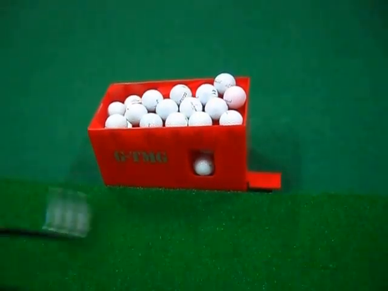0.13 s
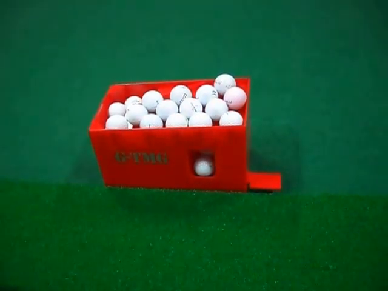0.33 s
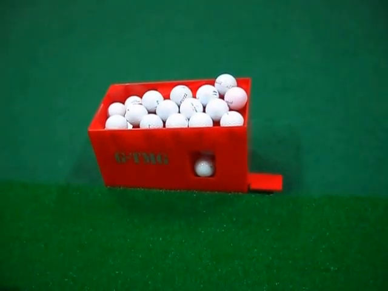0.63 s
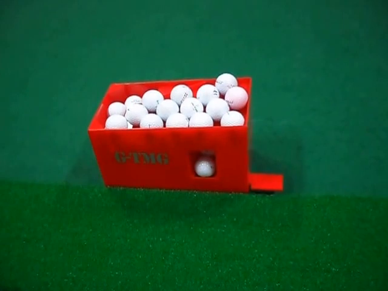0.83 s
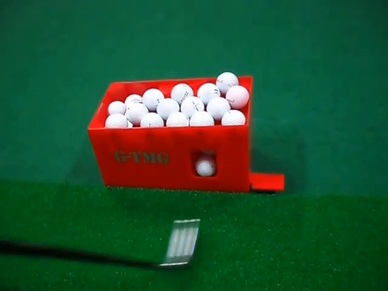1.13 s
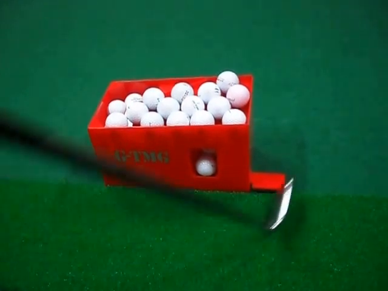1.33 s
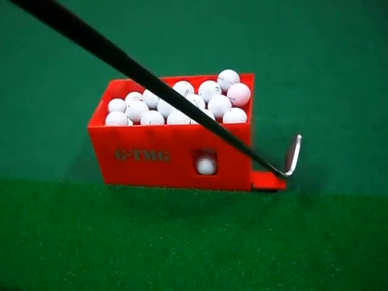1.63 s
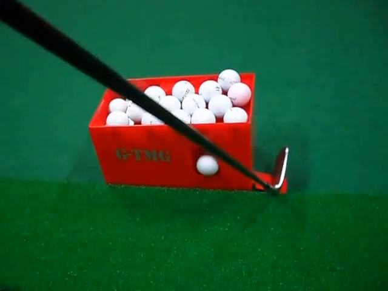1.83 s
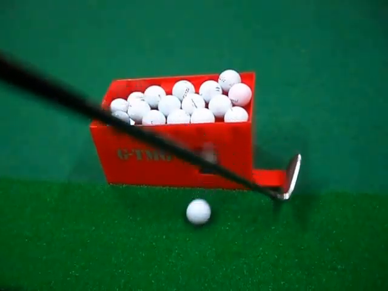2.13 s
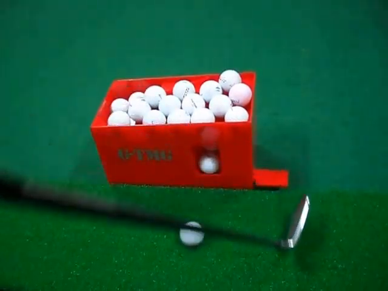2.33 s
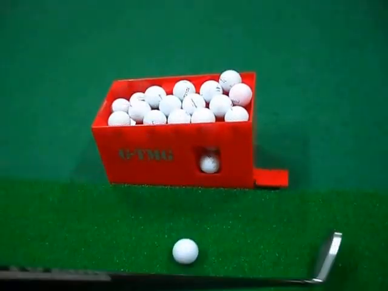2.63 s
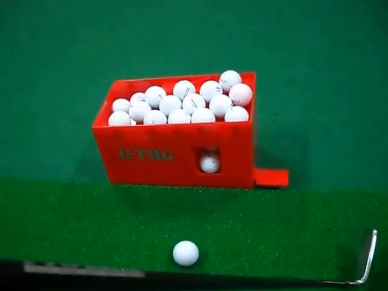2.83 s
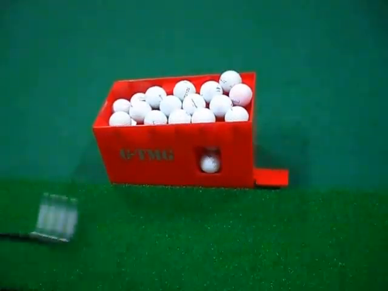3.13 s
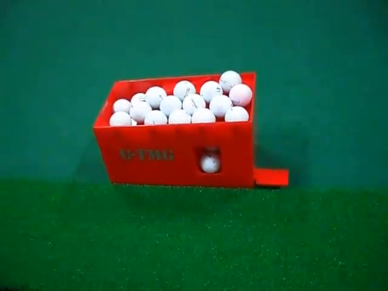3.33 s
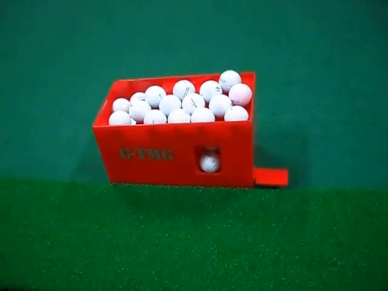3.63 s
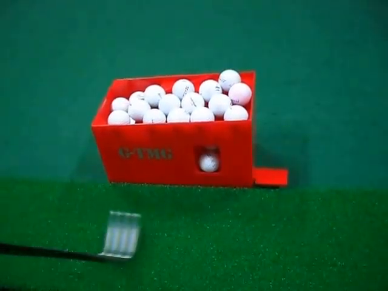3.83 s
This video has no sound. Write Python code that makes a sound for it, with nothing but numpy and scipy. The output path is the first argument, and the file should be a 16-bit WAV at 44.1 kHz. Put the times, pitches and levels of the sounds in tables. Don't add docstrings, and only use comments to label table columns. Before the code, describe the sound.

Golf chip shots in a small room, with padded thuds and a hollow plastic dispenser clacking between

```python
import sys
import numpy as np
from scipy import signal
from scipy.fft import rfft, irfft
from scipy.io import wavfile
from scipy.ndimage import map_coordinates

SR = 44100
rng = np.random.default_rng(int(sys.argv[2]) if len(sys.argv) > 2 else 0)


def makeup_ratio(level_db):
    decades = np.asarray(level_db, float) / 20
    return 10 ** decades


def digitize_waveform(pressure):
    field = np.atleast_2d(pressure).T
    bounded = np.clip(field, -1, 1)
    quanta = np.round(bounded * 32767).astype(np.int16)
    wavfile.write(sys.argv[1], SR, quanta)


N = 176400
SPAN = 2 ** 15
HZ = np.fft.rfftfreq(SPAN, 1 / SR)


def along(points, hz):
    f, v = np.transpose(points)
    return np.interp(np.log(hz + 1), np.log(f + 1), v)


def wobble(rate):
    knots = rng.standard_normal(int(N * rate / SR) + 4)
    return map_coordinates(knots, [np.arange(N) * rate / SR])


def hiss():
    # (frequency [Hz], density [dB per Hz])
    hiss_colour = [(18, 12), (30, 20), (60, 7), (90, 12.5), (300, 4), (1100, -1), (4000, -7),
                   (10400, -10.5)]
    hiss_db = -61.5
    gain = makeup_ratio(along(hiss_colour, np.fft.rfftfreq(N, 1 / SR)))
    noise = irfft(rfft(rng.standard_normal(N)) * gain, N)
    return makeup_ratio(hiss_db) * noise / noise.std()


def hum():
    # (time [s], level [dB])
    hum_swell = [(0.0, -60), (0.38, -66.5), (0.72, -52), (1.15, -59), (2.18, -59.5), (2.31, -62.5),
                 (2.53, -66), (2.67, -58), (2.84, -59), (3.3, -62.5), (3.52, -55.5), (4.0, -56.5)]
    hum_hz, wander_hz = 53.77, 5.02
    s, swell_db = np.transpose(hum_swell)
    level_db = np.interp(np.arange(N) / SR, s, swell_db) + 3 * wobble(9)
    phase = 2 * np.pi * np.cumsum(hum_hz + wander_hz * wobble(20)) / SR
    return np.sqrt(2) * makeup_ratio(level_db) * np.sin(phase)


def room(room_db):
    # (frequency [Hz], t60 [s])
    room_decay = [(60, 0.89), (250, 0.56), (1300, 0.67), (3500, 0.67), (9000, 0.4)]
    # (delay [s], level [dB])
    near_walls = [(.0052, -14.5), (0.0129, -12.5), (0.0162, -15), (0.025, -17.5)]
    build_s, scatter_s = 0.015, 0.0007
    hz, t, z = signal.stft(rng.standard_normal(SPAN), SR, nperseg=256)
    fade = makeup_ratio(-60 * t / along(room_decay, hz)[:, None])
    tail = signal.istft(z * fade, SR, nperseg=256)[1][:SPAN]
    s = np.arange(SPAN) / SR
    tail = tail * np.clip(s / build_s, 0, 1) ** 2 * (s < s[-1] - .08)
    bursts = sum(makeup_ratio(db) * (s > d) * np.exp(-np.abs(s - d) / scatter_s) for d, db in near_walls)
    walls = bursts * rng.standard_normal(SPAN) / np.sqrt(scatter_s * SR / 2)
    return rfft(walls + makeup_ratio(room_db) * tail / np.linalg.norm(tail))


def body(modes, order=1):
    total = 0
    for k, (centre, width, db) in enumerate(modes):
        resonance = 1j * HZ * width / (centre ** 2 - HZ ** 2 + 1j * HZ * width)
        total = total + (-1) ** k * makeup_ratio(db) * resonance ** order
    return total


def rattle(spread_s, first_db, count):
    u, size = rng.random(count), rng.standard_normal(count)
    u[0], size[0] = 0, -makeup_ratio(first_db)
    return np.transpose([2 * abs(spread_s) * u, size * makeup_ratio(-14 * u)])


def add(out, s, db, colour, contacts, room_db):
    lag, size = np.transpose(contacts)
    blow = (size * np.exp(-2j * np.pi * np.outer(HZ, lag))).sum(1) / np.linalg.norm(size)
    sound = out[int(round(s * SR)):][:SPAN]
    sound += makeup_ratio(db) * irfft(colour * (blow + room(room_db)), SPAN)[:len(sound)]


def thuds():
    # (time [s], level [dB], knock over boom [dB], shaking [s], first contact over the rest [dB])
    thud_events = [(.273, -32, 3, 0.0039, 14), (.449, -26.5, -5.5, .015, -7), (0.476, -38, -6.5, 0.011, -3),
                   (.582, -31.5, -4, 0.021, 1), (.665, -40, -7, 0.028, -8), (.822, -45.5, -11, 0.02035, -6),
                   (1.224, -42, -22, 0.015, 2), (1.461, -29.5, -3.5, 0.021, -4.5),
                   (1.578, -45, -14, .015, -9), (3.268, -33.5, 8.5, 0.00397, 3),
                   (3.311, -44.5, 4, 0.0086, -3), (3.435, -24, -4, .015, 6.5),
                   (3.485, -43.5, -14, 0.0148, -3), (3.577, -36, -6, 0.022, 8), (3.658, -39, -7, .02, 3),
                   (3.845, -37.5, -8, 0.0177, 9)]
    # (time [s], level [dB])
    thump_events = [(0.284, -39), (0.451, -29), (.50, -41), (.588, -28), (.825, -41.5), (0.928, -50),
                    (1.257, -35), (1.47, -29.5), (2.016, -43), (2.192, -44.5), (3.278, -43), (3.442, -30.5),
                    (3.583, -32), (3.855, -35), (3.923, -44)]
    # (centre [Hz], width [Hz], level [dB])
    boom = [(158.5, 58, -2.5), (197, 30, 4), (250.3, 26, 2.5), (319.4, 94, 2)]
    knock = [(428, 113, -9), (481, 73, -6.5), (649, 150, -4), (787, 119, -4.5), (940, 145, -9.5),
             (1690, 1600, -17)]
    boards = [(65.7, 21.4, -16), (105.1, 50, -0.5)]
    soft_hz = 1200
    soft = 1 / (1 - (HZ / soft_hz) ** 2 + 1.3j * HZ / soft_hz) ** 3
    out = np.zeros(N)
    for s, db, knock_db, shake_s, first_db in thud_events:
        colour = soft * (body(boom) + makeup_ratio(knock_db) * body(knock))
        add(out, s, db + 40.5, colour, rattle(shake_s, first_db, count=14), room_db=-1)
    for s, db in thump_events:
        add(out, s, db + 51.5, body(boards, order=2), [(0, 1)], room_db=-5.5)
    return out


def box():
    # (time [s], level [dB], hollow case [dB], sharp edge [dB], chatter [s])
    clack_events = [(1.229, -58.5, -13, 0, 0.032), (1.793, -40.5, -3, -3, 0.0053),
                    (1.841, -46, 7.5, 2, 0.0066), (1.882, -55.5, 12.5, -16, 0.012),
                    (1.91, -55.5, 12, -5, .02), (2.017, -37, -1.5, 3, 0.006), (2.069, -45, -4, -7, 0.0091),
                    (2.14, -55, 9.5, -19.5, .015), (2.174, -29, 9, 6, 0.0064),
                    (2.216, -40, 13.5, 5.5, 0.0055), (2.235, -33, 3, -2.5, .006),
                    (2.257, -36.5, 3.5, -5.5, 0.0038), (2.272, -43, 15, -5, .004),
                    (2.316, -45.5, 3.5, -11, 0.0041)]
    # (centre [Hz], width [Hz], level [dB])
    hollow = [(235.7, 42, 0.5), (289.4, 34, -2.5), (336, 36.6, -5), (430, 57, -8), (606, 42.3, -2),
              (784, 51, -3.5), (873, 89, -6)]
    shell = [(1125, 123, -1.5), (1376, 263, 5.5), (1603, 110, 8), (1862, 174, 4.5), (2100, 246, 4.5),
             (2420, 400, -0.5)]
    rim = [(3120, 1060, -5), (4380, 910, -17.5), (5180, 1040, -26), (7900, 4800, -36.5)]
    out = np.zeros(N)
    for s, db, hollow_db, edge_db, chatter_s in clack_events:
        colour = body(shell) - makeup_ratio(edge_db) * body(rim) + makeup_ratio(hollow_db + 13) * body(hollow)
        add(out, s, db + 30.5, colour, rattle(chatter_s, 6, count=40), room_db=-3.5)
    return out


def club():
    # (time [s], level [dB])
    strikes = [
        (0.07, -22),
        (3.059, -19.5),
    ]
    # (centre [Hz], width [Hz], level [dB])
    faces = [
        [(1080, 700, 5.5), (1850, 700, -4), (2270, 1440, -10.5), (2970, 1020, -12), (3970, 830, -6),
         (5420, 500, -13), (5900, 440, -15.5), (6920, 400, -14.5), (8240, 860, -15.5), (9700, 1500, -23),
         (195, 200, -1)],
        [(817, 410, -2), (1170, 510, -0.5), (1836, 750, -2), (2367, 350, -3.5), (3060, 800, -8),
         (4220, 226, 2.5), (4510, 490, -3.5), (5120, 470, -8), (6400, 450, -4), (8060, 620, -14.5),
         (9200, 1200, -15.5), (178, 300, -6)],
    ]
    # (lag [s], size)
    touch = [(.0003, 0.14), (.0012, -1.7), (.0036, -.3), (.0062, 0.022)]
    # (centre [Hz], width [Hz], level [dB])
    sole = [(600, 160, 4), (5770, 650, 0)]
    pedal_s, pedal_db = 1.7935, -20
    out = np.zeros(N)
    for (s, db), face in zip(strikes, faces):
        add(out, s, db + 22.5, -body(face, order=2), touch, room_db=-5.5)
    add(out, pedal_s, pedal_db, body(sole, order=2), [(0.0096, 1)], room_db=-6)
    return out


def scene():
    return (hiss() + hum() + thuds() + box() + club())[None]


def top_cut(x):
    return signal.sosfilt(signal.butter(12, 11520, fs=SR, output="sos"), x)


def record(dry):
    # (frequency [Hz], level [dB])
    treble_edge = [(10300, 1), (11000, -12.5), (11500, -25.5)]
    top_hz = 11500
    hz = np.fft.rfftfreq(N, 1 / SR)
    gain = makeup_ratio(along(treble_edge, hz)) * (hz < top_hz)
    return top_cut(irfft(rfft(dry) * gain, N))


dry = scene()
out = record(dry)
digitize_waveform(out)
```